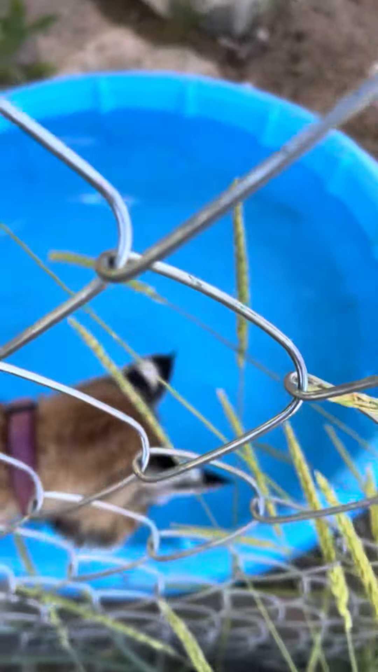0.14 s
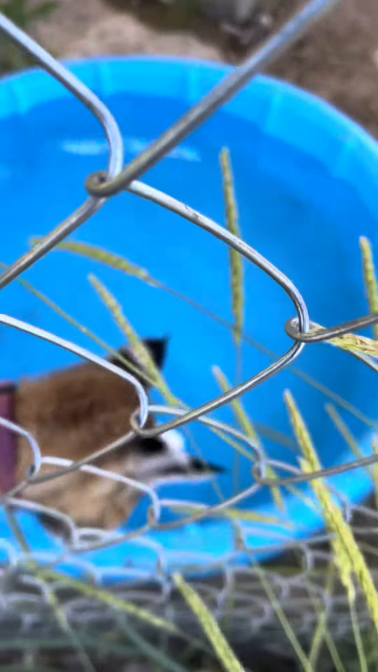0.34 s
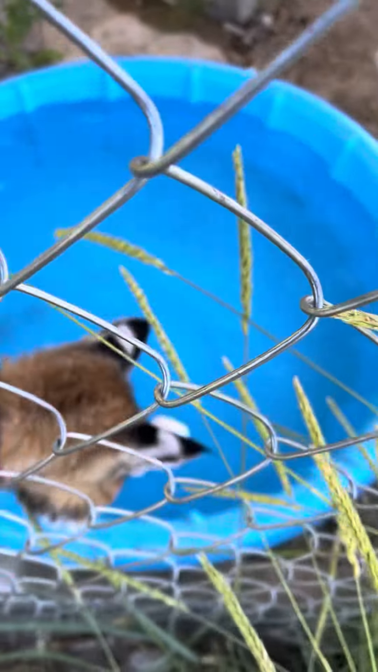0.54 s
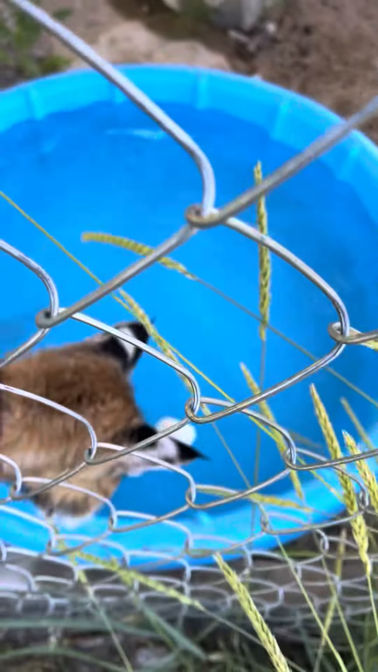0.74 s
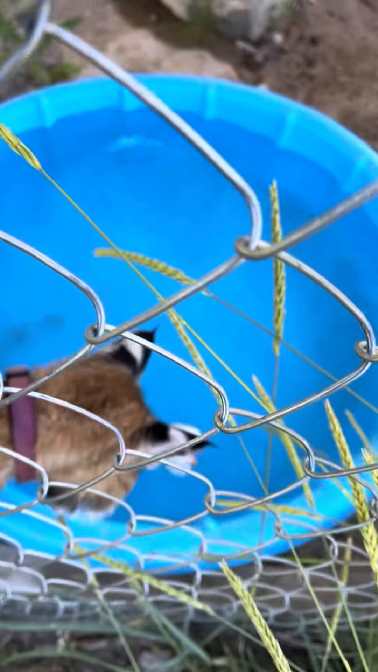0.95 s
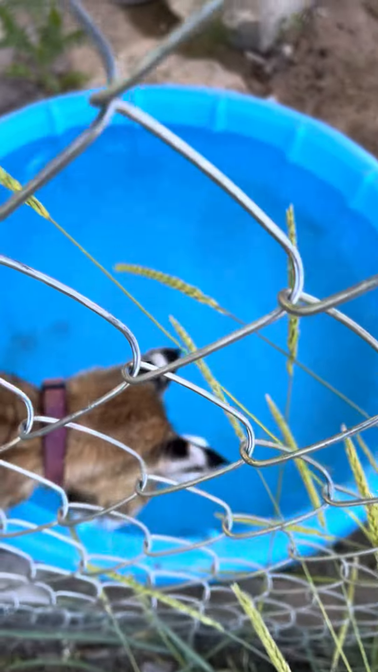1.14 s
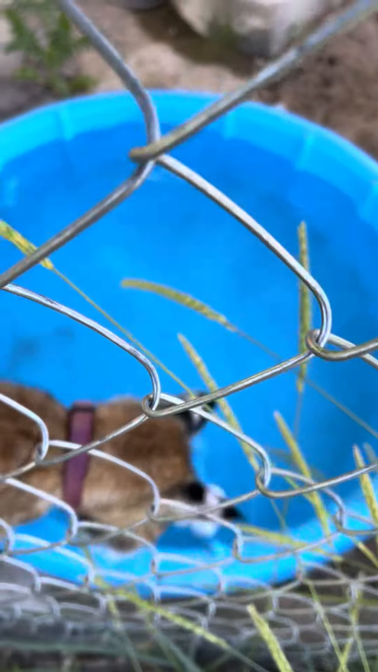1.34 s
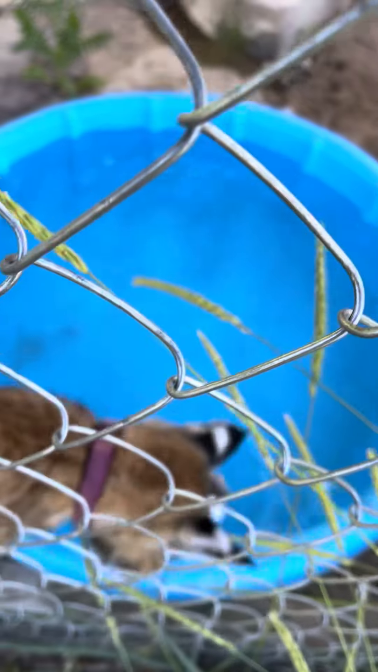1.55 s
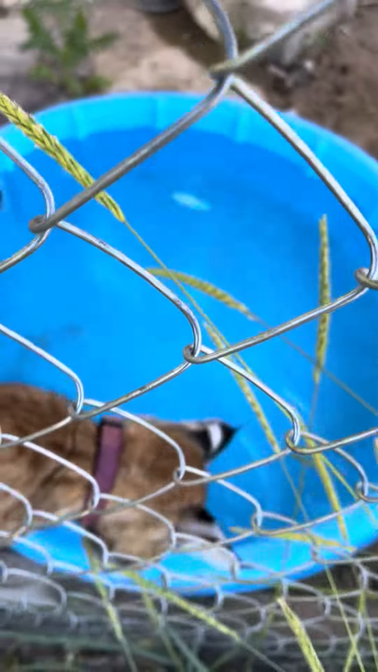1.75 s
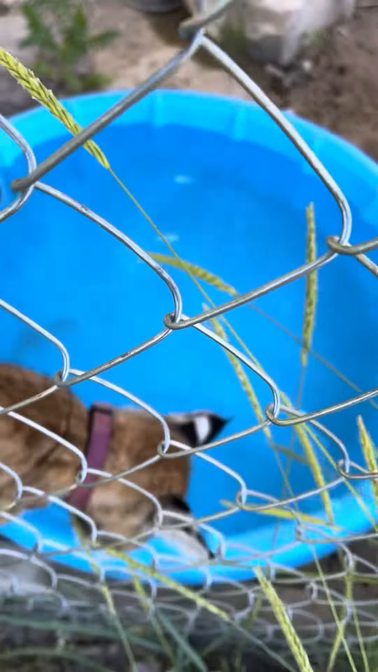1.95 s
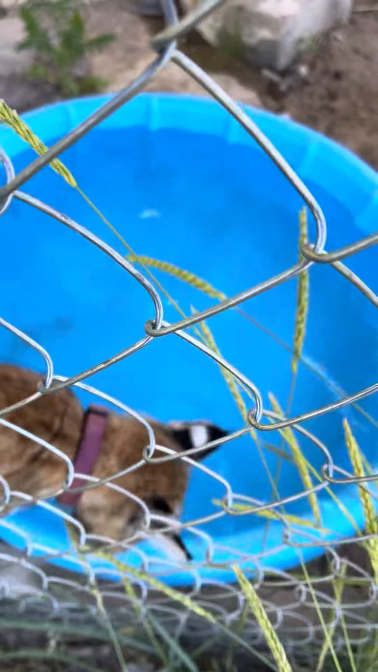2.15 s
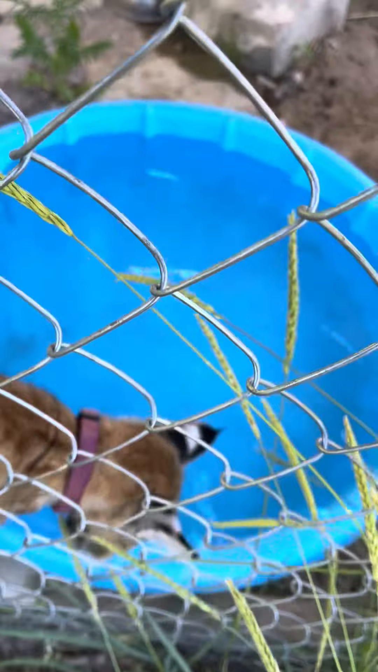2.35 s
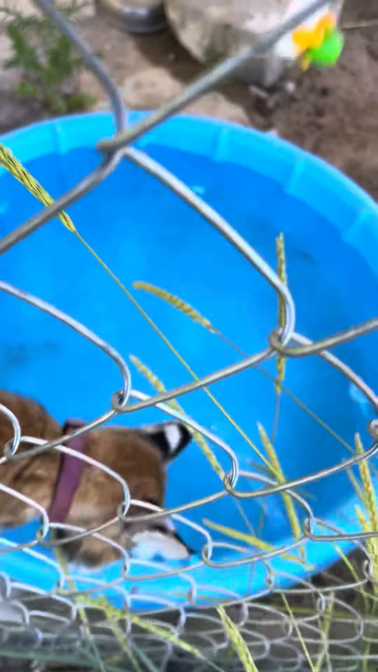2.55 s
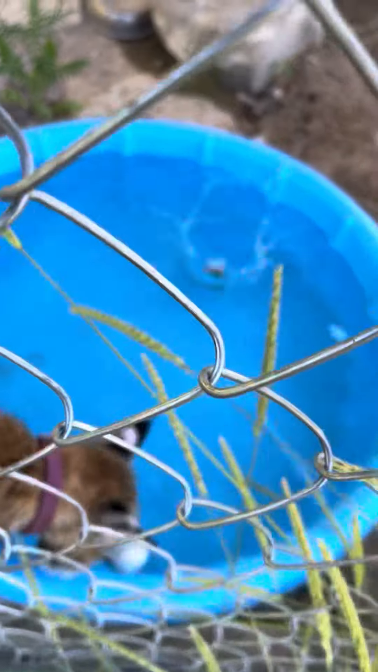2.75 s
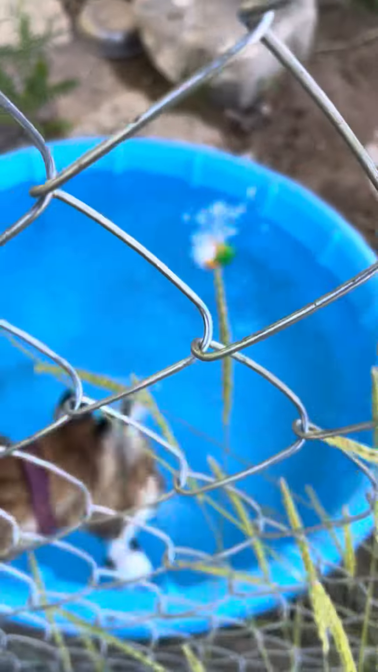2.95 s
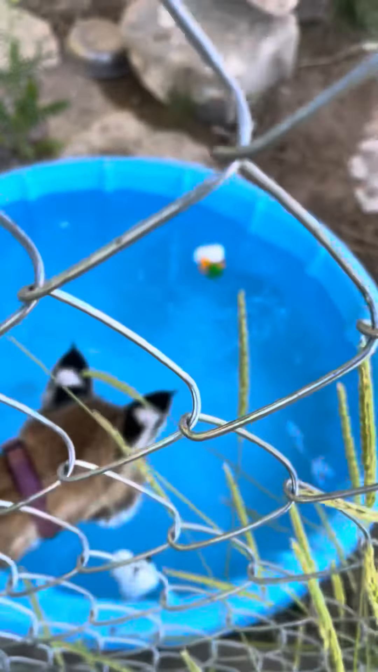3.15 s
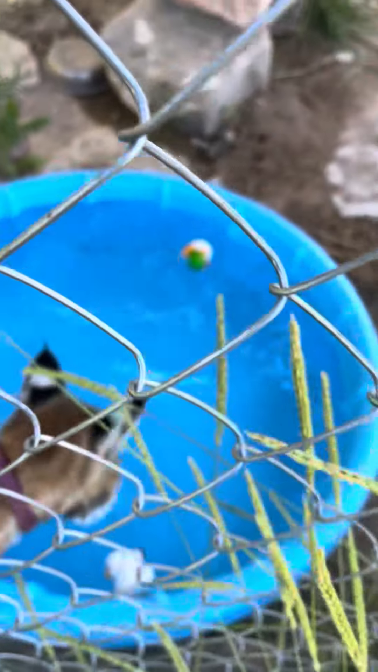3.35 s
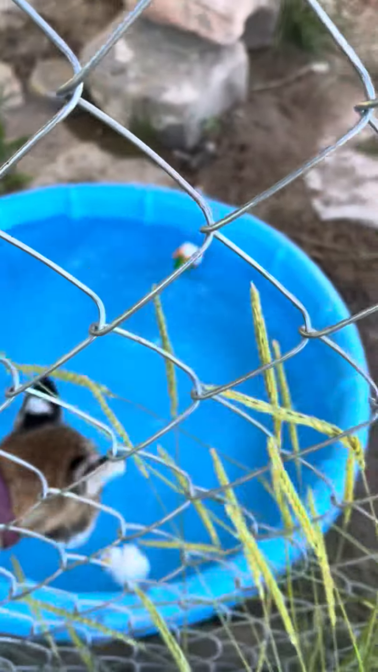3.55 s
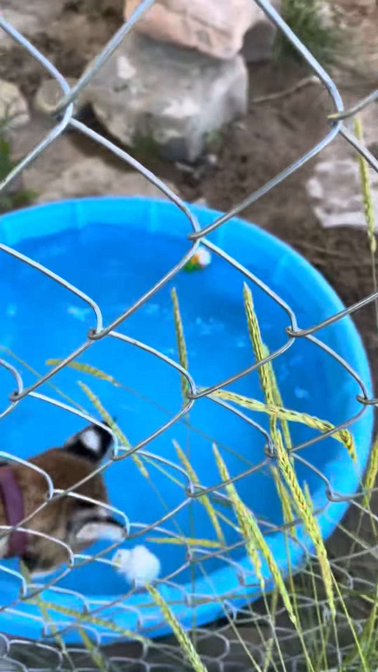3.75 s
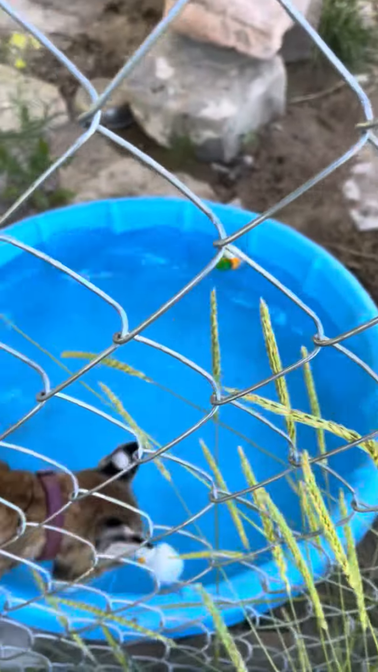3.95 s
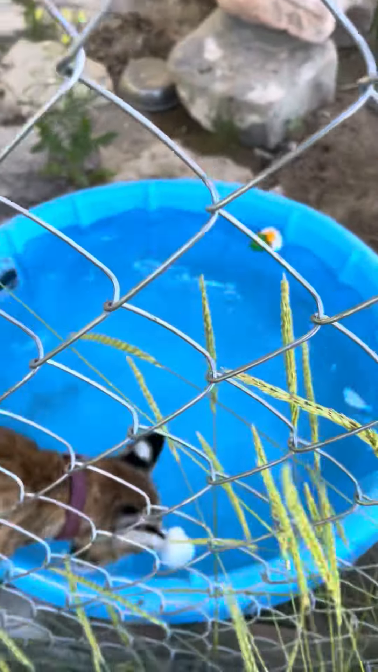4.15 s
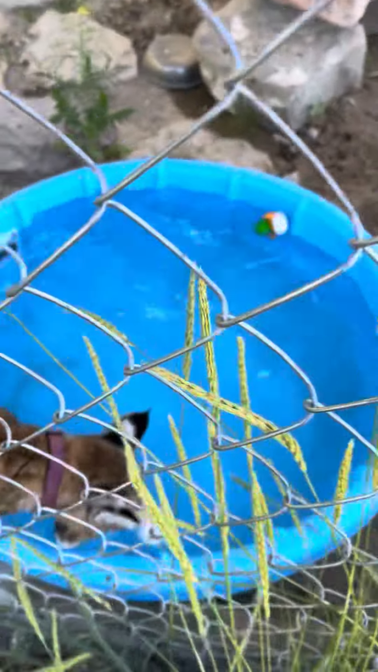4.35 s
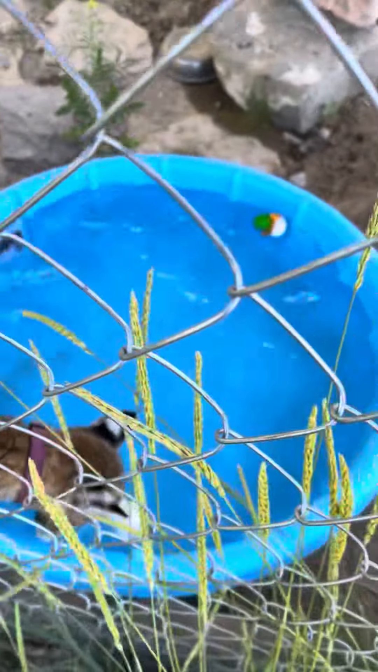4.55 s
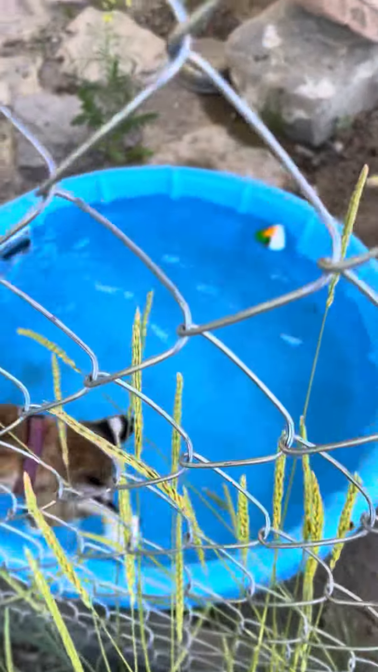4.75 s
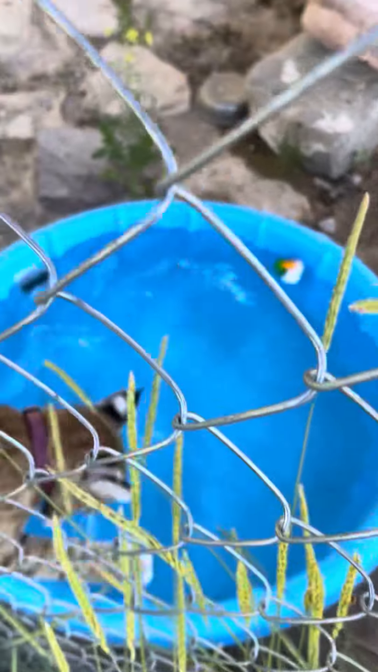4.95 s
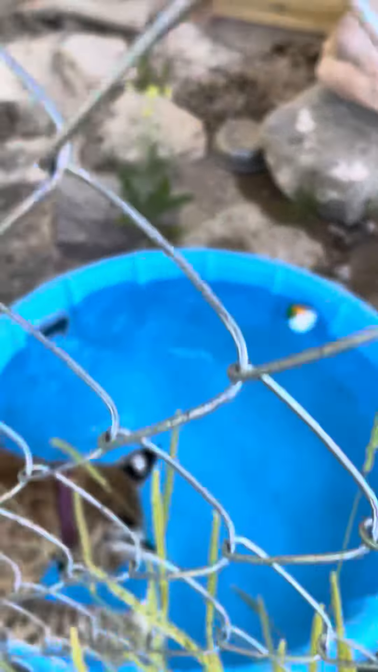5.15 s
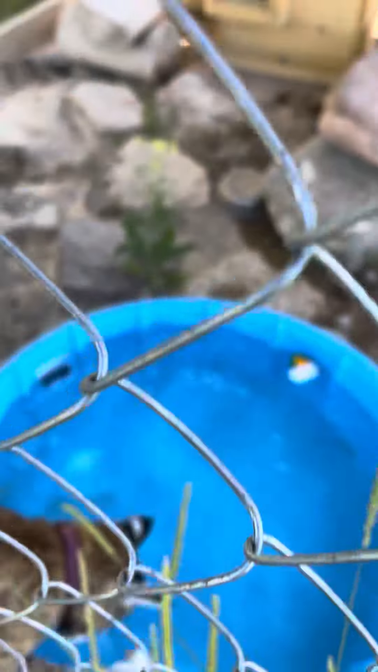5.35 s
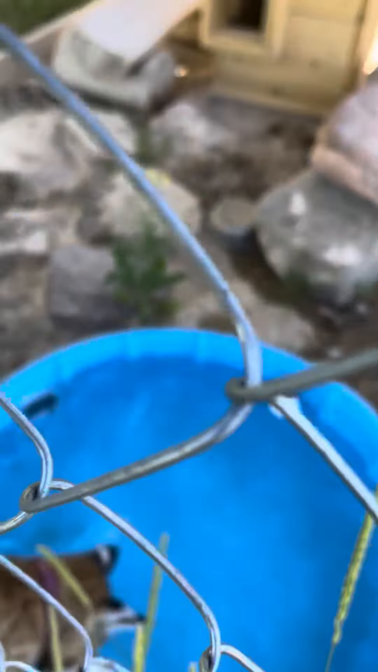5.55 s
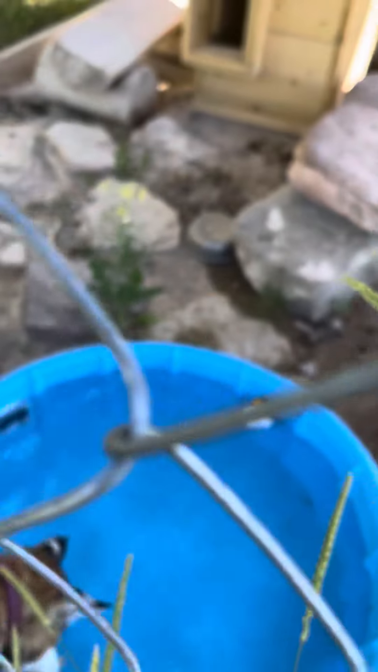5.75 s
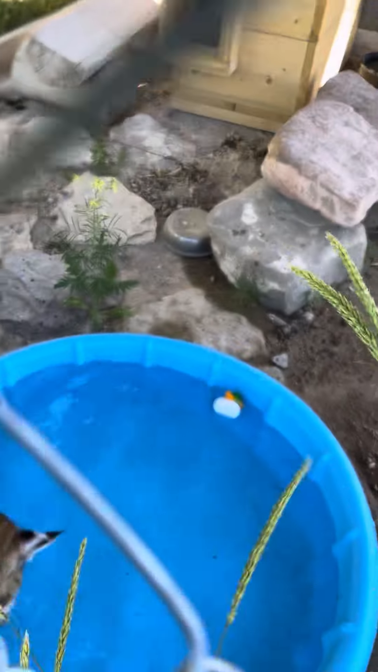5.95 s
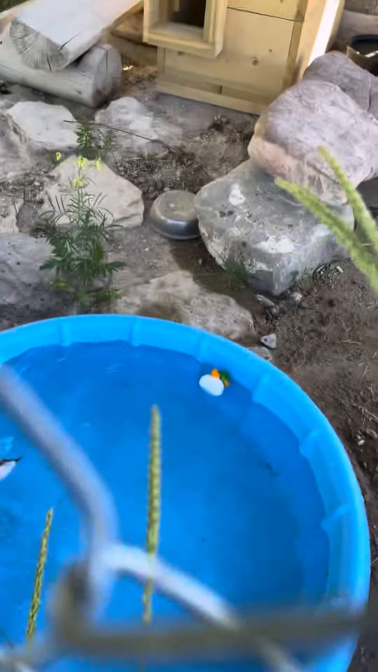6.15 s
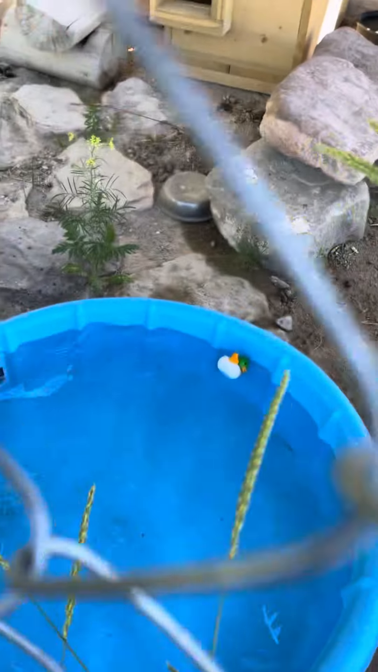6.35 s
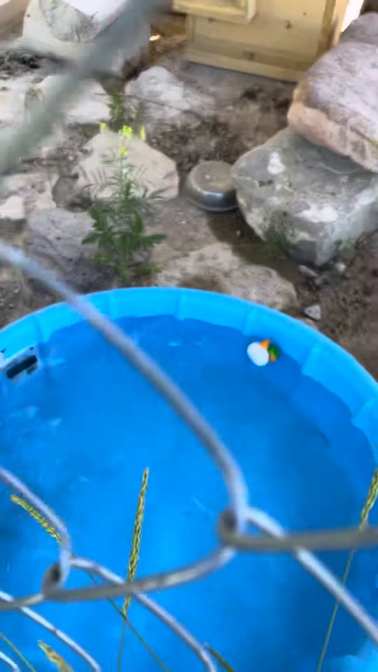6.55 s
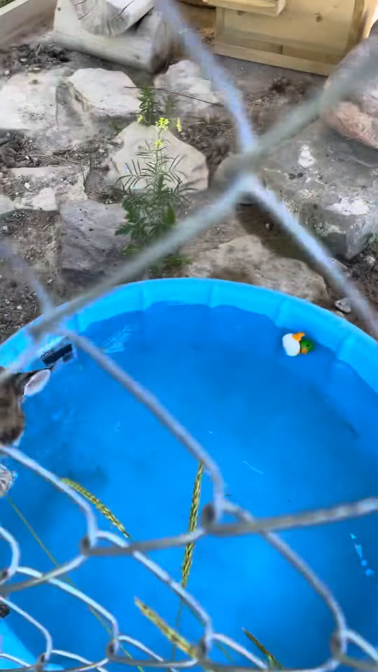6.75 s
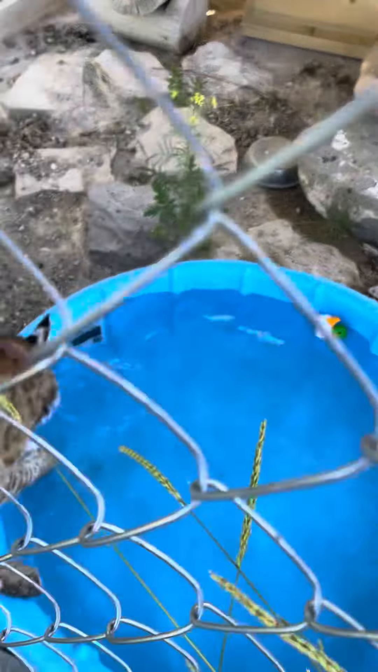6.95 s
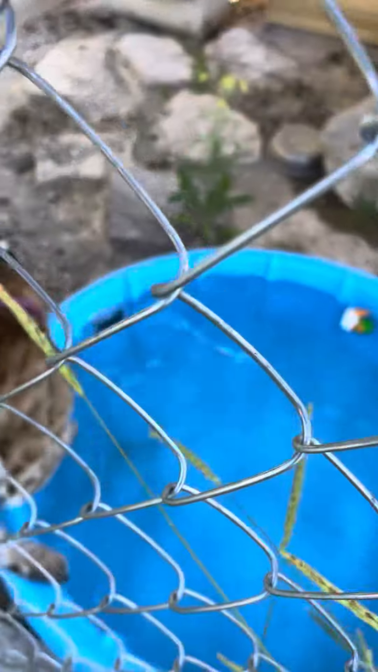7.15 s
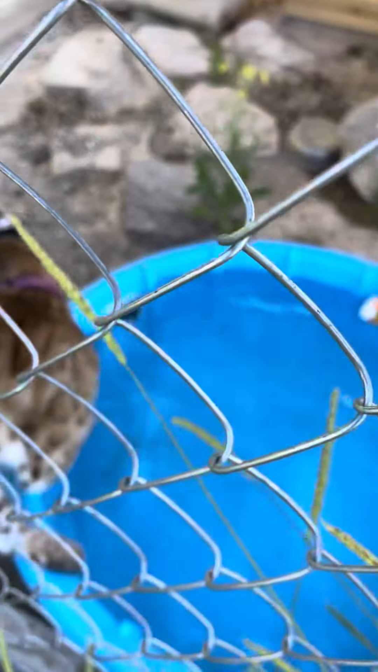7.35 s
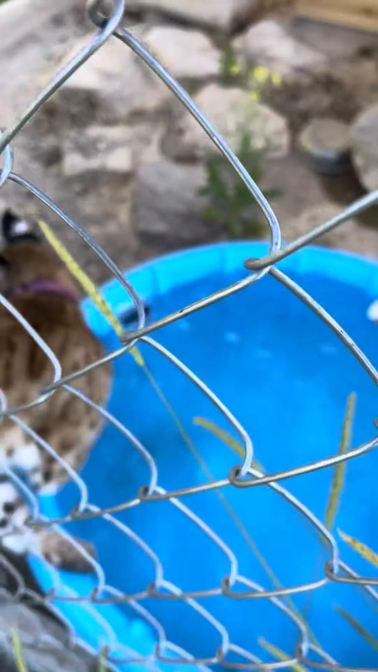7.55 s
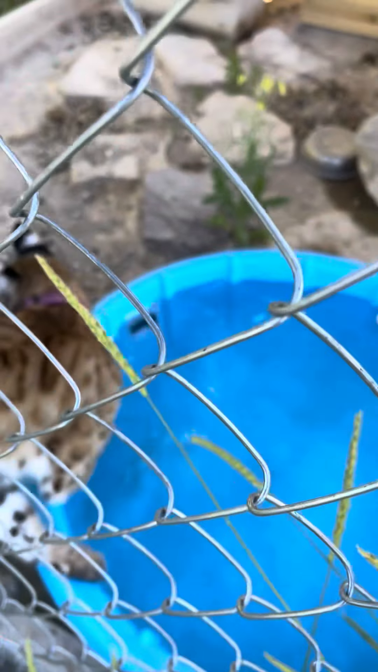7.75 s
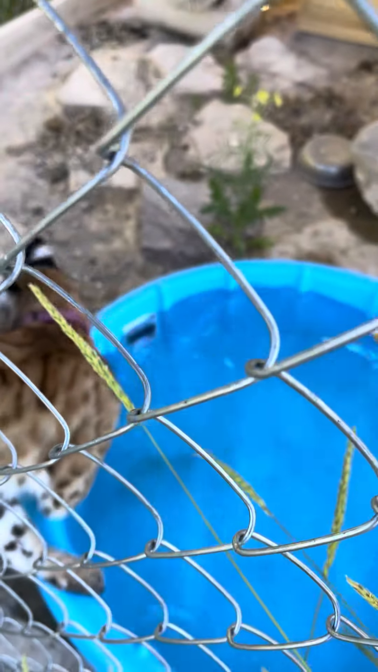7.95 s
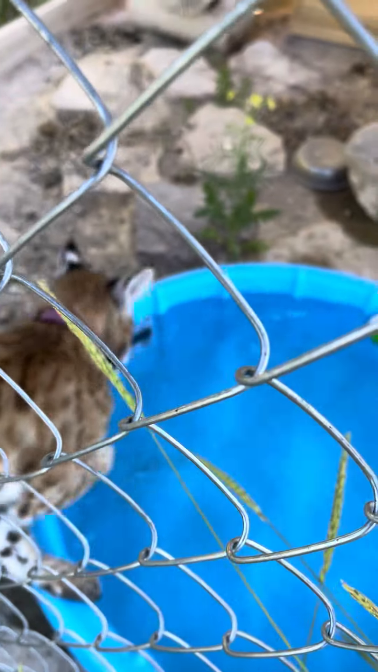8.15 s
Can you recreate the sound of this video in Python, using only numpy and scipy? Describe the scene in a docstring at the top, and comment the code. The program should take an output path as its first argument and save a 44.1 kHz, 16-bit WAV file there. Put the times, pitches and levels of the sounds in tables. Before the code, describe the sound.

A low fluttering throb in a quiet yard, then an animal splashes in a plastic pool, with one loud sharp slap and later hollow thumps.

```python
"""A low throb flutters over a quiet yard, then a wild cat wades in a plastic paddling pool outdoors.
Paws ring the modes of the thin tub; bubbles plop, air pockets gurgle and random drops spatter.
A tossed toy slaps the water hard, made as a noise crack with thin spray; grass rustles in noise swells.
A stereo spatializer turns the phase between left and right."""
import sys
import numpy as np
from scipy import signal
from scipy.fft import rfft, irfft, next_fast_len
from scipy.io import wavfile
from scipy.ndimage import uniform_filter1d

SR = 44100
rng = np.random.default_rng(int(sys.argv[2]) if len(sys.argv) > 2 else 0)


def materialize(psi):
    """Save the field psi as 16-bit PCM at rate SR to the path in sys.argv[1].

    A 1-D psi becomes a single channel; in a 2-D psi each row is a channel.
    """
    bounded = np.clip(np.atleast_2d(psi).T, -1, 1)
    quanta = np.round(bounded * 32767).astype(np.int16)
    wavfile.write(sys.argv[1], SR, quanta)


def rack_gain(trim_db):
    """Turn a fader trim in dB into the linear factor to multiply a signal by."""
    fader = np.asarray(trim_db, float)
    return 10 ** (fader / 20)


N = 365588


def rms_one(x):
    """Normalization: scales a signal to an effective value of one."""
    return x / np.sqrt(np.mean(x ** 2) + 1e-20)


def in_time(rows):
    """Linear interpolation: turns timed rows into one curve for each column."""
    s, *columns = np.transpose(rows)
    return [np.interp(np.arange(N) / SR, s, column) for column in columns]


def at_hz(points, hz):
    """Logarithmic frequency scale: interpolates a response evenly per octave."""
    point_hz, value = np.transpose(points)
    return np.interp(np.log(hz), np.log(point_hz), value)


def band(x, low_hz, high_hz):
    """Band-pass filtering: passes the range between two corner frequencies."""
    return signal.sosfilt(signal.butter(2, [low_hz, high_hz], "band", fs=SR, output="sos"), x)


def add(out, s, piece):
    """Superposition: adds a sound to the sum from time s onward."""
    at = round(s * SR)
    out[at:at + len(piece)] += piece[:N - at]


def drift(rate_hz):
    """Low-pass random process: slow chance of spread 1, from noise through a double pole at rate_hz."""
    every = 40   # samples between computed points
    r = np.exp(-2 * np.pi * rate_hz * every / SR)
    noise = rng.standard_normal(N // every + 2002)
    slow = signal.lfilter([1], [1, -2 * r, r * r], noise)[2000:]   # skips the filter's build-up
    return np.interp(np.arange(N) / every, np.arange(len(slow)), rms_one(slow))


def diffuse(spectrum, level_db, flicker_db, flicker_hz):
    """Diffuse-field coherence: coloured noise from all round, part shared and part opposed between sides."""
    # likeness of diffuse sound in the two channels: (frequency [Hz], correlation [-1 to 1])
    likeness = [(60, .97), (170, .8), (350, .2), (700, -.2), (1100, -.3), (1600, .85), (4400, .9),
                (4750, 1), (7300, .85), (8400, 1), (12000, .99)]
    hz = np.maximum(np.fft.rfftfreq(N, 1 / SR), 1)
    alike = at_hz(likeness, hz)
    mid, side = rfft(rng.standard_normal((2, N))) * rack_gain(at_hz(spectrum, hz))
    shared = np.sqrt(1 + alike) * mid
    opposed = np.sqrt(1 - alike) * side * [[1], [-1]]
    both = irfft(shared + opposed, N)
    return rms_one(both) * rack_gain(level_db + flicker_db * drift(flicker_hz))


def swells():
    """Addition of powers: each swell of rustle rises, holds on a slope and fades."""
    # rustling grass: (start [s], length [s], level at start [dB], slope while it lasts [dB/s])
    rustle_swells = [(1.495, 0.18, -65, 31), (2.73, 0.51, -60, 15), (3.63, 0.42, -54.5, 8.5),
                     (4.072, 0.31, -58.5, -7), (4.739, 0.22, -50, -10.5), (6.01, 0.59, -52.5, -1)]
    rise_s, fade_s = 0.078, 0.035   # time constants of amplitude
    t = np.arange(N) / SR
    power = 1e-12
    for start, length, db, slope in rustle_swells:
        rise = np.minimum(t - start, 0) / rise_s
        fade = np.maximum(t - start - length, 0) / fade_s
        held = rack_gain(db + slope * np.clip(t - start, 0, length))
        power = power + held ** 2 * np.exp(2 * (rise - fade))
    return np.sqrt(power)


def throb():
    """Frequency modulation: low beats whose pitch sinks exponentially, no two quite alike."""
    lone_beat_s, lone_beat_db = 0.016, -47
    run_start_s, beat_gap_s, beat_jitter_s = 0.187, 0.052, 0.002
    run_peak_s, run_peak_db, run_fall_db_per_s = 0.385, -43, 28   # loudest near the middle of the run
    out, t = np.zeros(N), np.arange(SR // 20) / SR
    wobble = drift(60)
    run = run_start_s + beat_gap_s * np.arange(11) + beat_jitter_s * rng.standard_normal(11)
    run_db = run_peak_db - run_fall_db_per_s * abs(run - run_peak_s)
    beats = [(lone_beat_s, lone_beat_db), *zip(run, run_db)]
    for (s, db), (pitch, length) in zip(beats, rng.normal(1, .1, (len(beats), 2))):
        sweep_hz = 310 * rack_gain(0.4 * (db - run_peak_db))   # weaker beats start lower
        hz = 92 * pitch + sweep_hz * np.exp(-t / 0.0033)
        phase = 2 * np.pi * np.cumsum(hz) / SR + 0.82 * wobble[round(s * SR):][:len(t)]
        shape = (1 - np.exp(-t / 0.0011)) / (1 + (t / (0.027 * length)) ** 6)
        add(out, s, rack_gain(db) * np.sin(phase) * shape)
    return out


def swashes():
    """Band-limited turbulence: lumpy noise some 500 Hz wide, swelling and sinking softly."""
    # soft rough surges of water: (time [s], length [s], centre [Hz], level before the lumps [dB])
    surges = [(4.136, 0.023, 544, -57), (4.178, 0.025, 715, -54), (4.497, 0.1, 489, -65),
              (5.755, 0.014, 2300, -53.5)]
    out, lumps = np.zeros(N), rack_gain(3.0 * drift(40))
    for s, length, hz, db in surges:
        t = np.arange(int((length + .05) * SR)) / SR
        edges = hz - 260, hz + 260
        noise = rms_one(band(band(rng.standard_normal(len(t)), *edges), *edges))
        shape = (1 - np.exp(-t / 0.002)) * np.exp(-np.maximum(t - length, 0) / 0.02)
        add(out, s, rack_gain(db) * shape * noise * lumps[round(s * SR):][:len(t)])
    return out


def bubble(hz, t60, rise):
    """Bubble resonance: a dying sine whose pitch climbs as the bubble nears the surface."""
    t = np.arange(int(t60 * SR) + 50) / SR
    tone = np.sin(2 * np.pi * hz * (t + rise * t * t / t60))
    return tone * rack_gain(-60 * t / t60) * (1 - np.exp(-t / 0.0004))


def spatter():
    """Poisson-like arrivals: small drops ring briefly at random, over a lumpy wash of thrown water."""
    # loose spatter: (start [s], end [s], drops [1/s], wash level [dB])
    showers = [(1.389, 2.15, 210, -74), (2.692, 2.75, 470, -46), (2.755, 3.308, 390, -63.5),
               (3.467, 3.504, 270, -42.5), (5.3, 6.018, 40, -74), (6.027, 6.75, 260, -60),
               (6.873, 6.98, 153, -53.5)]
    t = np.arange(N) / SR
    per_s, wash = np.zeros(N), np.zeros(N)
    for start, end, rate, db in showers:
        falling = (t > start) * (t < end)
        per_s += rate * falling
        wash += rack_gain(db) * falling
    wash = uniform_filter1d(wash, size=800)   # softens the starts and ends

    sizes = rack_gain(4.5 * np.minimum(rng.exponential(1, N), 3)) * rng.choice([-1, 1], N)
    born = rng.random(N) < per_s / SR
    dealt = rng.integers(0, 16, N)   # gives each drop one of 16 pitches
    drops = 0
    for k, hz in enumerate(np.geomspace(1000, 6500, 16)):
        drop = bubble(hz, 22.0 / hz + .005, rise=.25)
        drops = drops + signal.oaconvolve(sizes * born * (dealt == k), drop)[:N]

    edges = np.geomspace(600, 4200, 4)
    lumps = 0
    for low, high in zip(edges, edges[1:]):   # each band swells by itself
        noise = rms_one(band(rng.standard_normal(N), low, high))
        lumps = lumps + noise * rack_gain(9.5 * drift(20))
    return rack_gain(-56) * drops + wash * rms_one(lumps)


def gurgles():
    """Cavity resonance: a trapped air pocket glides and wavers; jolting water breaks up the longer ones."""
    # air pockets: (time [s], length [s], first pitch [Hz], last pitch [Hz], level [dB])
    pockets = [(1.861, 0.046, 954, 760, -50), (3.124, 0.024, 696, 900, -51.5),
               (3.168, 0.0042, 1020, 1350, -39), (3.202, 0.011, 1640, 1720, -51.5),
               (3.241, 0.0076, 1740, 1590, -39.5), (4.508, 0.024, 856, 830, -60),
               (5.833, 0.036, 760, 1023, -61.5), (5.975, 0.017, 1300, 1150, -62),
               (6.023, 0.005, 930, 880, -41.5), (6.156, 0.053, 756, 791, -34),
               (6.213, 0.04, 832, 653, -35.5), (6.262, 0.014, 700, 750, -44), (6.358, 0.054, 597, 550, -48)]
    out, jolts, waver = np.zeros(N), drift(149) + 1j * drift(145), drift(30)
    for s, length, first_hz, last_hz, db in pockets:
        t, at = np.arange(int((length + 0.0532) * SR)) / SR, round(s * SR)
        rough = min(length / .12, .9)
        glide_hz = np.interp(t, [0, length + 0.0039], [first_hz, last_hz])
        hz = glide_hz * (1 + .07 * rough * waver[at:at + len(t)])
        shape = (1 - np.exp(-t / 0.0012)) * np.exp(-np.maximum(t - length, 0) / 0.007)
        drive = 1 - rough + rough * jolts[at:at + len(t)]   # jolts both strength and phase
        tone = np.imag(drive * np.exp(2j * np.pi * np.cumsum(hz) / SR))
        add(out, s, rack_gain(db) * shape * tone)
    return out


def ticks():
    """Impulsive noise: a light touch, 2 ms later the crack of a drop or slap, then thin spray."""
    # drops and slaps on water and plastic:
    # (time [s], crack peak [dB], centre [Hz], top treble relative to the crack [dB])
    impacts = [(0.3215, -39, 7300, -12), (0.464, -39, 6460, -36), (1.464, -38, 3000, -16),
               (1.74, -32, 3800, -30), (1.8797, -29, 5870, -3), (2.7022, -2, 3900, -15),
               (2.7584, -37.5, 7000, 10.5), (2.798, -18.5, 6650, -6.5), (2.874, -31, 4500, -5),
               (2.918, -18.5, 6200, -7), (3.0024, -25.5, 6340, -14), (3.062, -23, 6600, -13.5),
               (3.099, -34.5, 3660, -9), (3.179, -32, 4650, -6.5), (3.273, -24.5, 5930, -4),
               (5.3742, -40.5, 4160, -41), (5.499, -40, 3820, -1.5), (5.725, -20, 4970, -22),
               (5.942, -33.5, 4430, -52), (6.0689, -25.5, 8200, -17), (6.557, -35, 3230, 11.5),
               (6.971, -38, 5600, -18.5)]
    out, t = np.zeros(N), np.arange(SR // 5) / SR
    after = np.maximum(t - .0025, 0)
    burst = np.exp(-after / .0005) + .15 * np.exp(-after / .005) + .04 * np.exp(-after / .025)
    shape = np.where(t < .0025, .12, burst)
    for s, db, hz, top_db in impacts:
        low, wide, top = rng.standard_normal((3, len(t))) * shape
        crack = rms_one(band(low, hz * 0.78, hz * 1.39)) + 0.39 * rms_one(band(wide, 2000, 8900))
        top = band(band(top, 9500, 12200), 9500, 12200)
        tick = crack / np.abs(crack).max() + rack_gain(top_db) * top / np.abs(top).max()
        add(out, s - .002, rack_gain(db) * tick)
    return out


def plops():
    """Bubble resonance: a tone along with a short wet smack; small bubbles die sooner."""
    # single bubbles closing: (time [s], nominal level [dB], pitch [Hz])
    closings = [(1.396, -43, 1050), (1.497, -33.5, 1030), (1.518, -42, 2020), (1.558, -37.5, 1350),
                (1.601, -37.5, 1080), (1.737, -41, 910), (1.787, -43.5, 1090), (1.81, -46.5, 3150),
                (1.836, -36, 800), (1.843, -43.5, 2190), (1.88, -33.5, 934), (1.982, -53, 1510),
                (2.037, -44, 1050), (2.06, -44, 1050), (2.106, -43, 1010), (2.702, -29, 1340),
                (2.798, -36, 2150), (2.81, -34, 2830), (2.83, -40, 3150), (2.924, -41, 2590),
                (2.944, -43.5, 1710), (3.07, -42, 1460), (3.15, -40.5, 2100), (3.271, -34, 1620),
                (4.115, -38, 820), (5.311, -43, 2690), (5.471, -52, 3230), (5.725, -31.5, 2300),
                (5.887, -54, 1460), (6.0048, -47, 3110), (6.071, -45, 1660), (6.14, -41, 1170),
                (6.154, -30, 805), (6.217, -43.5, 2130), (6.251, -41, 1890), (6.305, -36.5, 1650),
                (6.337, -40.5, 990), (6.36, -37.5, 2260), (6.384, -38.5, 1830), (6.455, -21.5, 840),
                (6.481, -31, 1310), (6.534, -26.5, 1016), (6.562, -38.5, 1920), (6.606, -40, 3000),
                (6.687, -49, 1900), (6.726, -35, 826), (6.859, -45, 1280), (6.874, -46.5, 1420),
                (6.918, -37.5, 744), (6.954, -45, 2200)]
    out, t = np.zeros(N), np.arange(SR // 10) / SR
    for s, db, hz in closings:
        t60 = (0.012 + 18.0 / hz) * rng.uniform(.7, 1.4)
        smack = rng.standard_normal(len(t)) * (np.exp(-t / 0.00075) + 0.24 * rack_gain(-30 * t / t60))
        wet = band(band(smack, hz * 0.62, hz * 2.4), hz * 0.62, hz * 2.4)
        add(out, s, rack_gain(db + 1.0) * bubble(hz, t60, rise=0.13))
        add(out, s, rack_gain(db - 2.5) * wet / np.abs(wet).max())
    return out


def thumps():
    """Modal excitation: a few ms of uneven contact ring all tub modes, with a slap of water."""
    # paw against the tub: (time [s], peak of the ring [dB], favoured pitch [Hz], basic ring t60 [s])
    blows = [(1.396, -33.5, 237, 0.22), (1.47, -40, 252, 0.22), (1.606, -33.5, 245, 0.21),
             (1.687, -36.5, 400, 0.15), (1.786, -44, 259, 0.096), (1.88, -39.5, 410, 0.16),
             (1.933, -32.5, 372, 0.16), (2.04, -38, 345, 0.56), (2.105, -33.5, 390, 0.075),
             (2.7, -26.5, 293, 0.023), (3.475, -39.5, 298, 0.29), (6.154, -25.5, 324, 0.017),
             (6.457, -16.5, 230, 0.22), (6.529, -35.5, 217, 0.37), (6.638, -44, 314, 0.58),
             (6.74, -36.5, 293, 0.11), (6.92, -30, 292, 0.38), (7.016, -34.5, 311, 0.25),
             (8.124, -45.5, 301, 0.37)]
    # modes of the tub: (frequency before detuning [Hz], level [dB], share of the ring time [ratio])
    tub_modes = [(168.1, -2.5, 1.1), (237, 3, 0.41), (297.3, 3.5, 0.81), (340.6, 0.5, 0.73),
                 (418.8, 1, 0.93)]
    out, t, shaken = np.zeros(N), np.arange(SR // 2) / SR, drift(50)
    for s, db, favoured_hz, ring in blows:
        contact = rng.standard_normal(len(t)) * (np.exp(-t / 0.005) + 0.22 * np.exp(-t / 0.035))
        blow = 0
        chances = rng.standard_normal((len(tub_modes), 2))
        for (hz, mode_db, share), (strength, detune) in zip(tub_modes, chances):
            r = rack_gain(-60 / (max(ring * share, .01) * SR))   # decay per sample
            w = 2 * np.pi * hz * (1 + 0.028 * detune) / SR
            mode = signal.lfilter([0, np.sin(w)], [1, -2 * r * np.cos(w), r * r], contact)
            place_db = -16 * abs(np.log2(hz / favoured_hz))   # the struck spot favours modes near one pitch
            blow = blow + rack_gain(mode_db + place_db + 2.0 * strength) * mode
        # water shakes the wall and soon stills it
        lapping = rack_gain(2.2 * shaken[round(s * SR):][:len(t)])
        stilling = np.exp(-(t / (0.5 * ring + .03)) ** 3)[:len(lapping)]
        blow = blow[:len(lapping)] * lapping * stilling
        blow = band(blow, 115, 720)   # the thin wall radiates no deep bass
        slap = band(band(contact, 350, 1500), 300, 2400)[:len(blow)]
        thump = blow / np.abs(blow).max() + rack_gain(-7.0) * slap / np.abs(slap).max()
        add(out, s + 0.0011, rack_gain(db) * thump)
    return out


def yard(x):
    """Early reflection: dull echoes from rocks and the tub wall, a different one on each side."""
    dull, out = band(x, 160, 6100), np.zeros((2, N))
    for side, (lag_s, db) in enumerate([(.004, -18), (.0055, -17)]):
        add(out[side], lag_s, rack_gain(db) * dull)
    return out


def scene():
    """Superposition: diffuse air noises, the centred pool and its echoes add up."""
    # noise spectra before level scaling: (frequency [Hz], relative spectral level [dB])
    rumble = [(25, -20.5), (40, 0), (60, 9.5), (100, 2.5), (200, -39)]
    slosh = [(80, -6), (170, -3), (500, -6.5), (900, -12), (1400, -20.5), (2500, -31)]
    hiss = [(700, -26.5), (1500, -7), (2600, -6), (5000, -2.5), (7300, -3), (9000, 1), (11000, -9.5),
            (13000, -33.5)]
    rustle = [(400, -9), (1500, -5), (3400, -10), (7300, -4.5), (11400, 0), (12500, -14.5), (14000, -26.5),
              (16000, -50)]
    # rumble level before flicker: (time [s], level [dB])
    rumble_level = [(0, -64.5), (8.29, -67)]
    # background levels before flicker: (time [s], slosh [dB], yard hiss [dB])
    background = [(0, -62, -65), (0.5, -67.5, -64), (0.75, -56, -62.5), (1.0, -65, -64), (1.35, -66, -63.5),
                  (1.6, -58.5, -63), (2.2, -59.5, -65.5), (2.7, -55, -58), (3.28, -59, -60),
                  (3.4, -59.5, -60), (4.05, -65.5, -57), (4.9, -60, -73), (5.05, -62.5, -64.5),
                  (5.6, -64.5, -63.5), (5.95, -71, -65.5), (6.3, -54.5, -91), (6.7, -55.5, -63),
                  (7.15, -71.5, -67.5), (8.29, -67.5, -70)]
    slosh_db, hiss_db = in_time(background)
    air = diffuse(rumble, *in_time(rumble_level), flicker_db=1.5, flicker_hz=4)
    air = air + diffuse(slosh, slosh_db, flicker_db=2.7, flicker_hz=1.9)
    air = air + diffuse(hiss, hiss_db, flicker_db=2.3, flicker_hz=5)
    air = air + swells() * diffuse(rustle, 0, flicker_db=2.0, flicker_hz=12)
    pool = throb() + swashes() + spatter() + gurgles() + ticks() + plops() + thumps()
    return pool + yard(pool) + air


def top_cut(x):
    """Nothing passes above the cut-off."""
    return signal.sosfilt(signal.butter(12, 16350, fs=SR, output="sos"), x)


def record(dry):
    """Stereo widening: a fixed phase and level curve turns the sides apart; the top rolls off steeply."""
    # phase between the channels: (frequency [Hz], lead of left over right [rad])
    lead = [(1550, 0), (2900, 1.1), (3950, .9), (4480, 1.9), (4750, 3.13), (5000, 3.15), (5340, 5.1),
            (5700, 6.1), (6050, 6.3), (7240, 7.7), (8400, 9.42), (9600, 9.43), (11400, 11.6), (13000, 12.3)]
    # level between the channels: (frequency [Hz], left minus right [dB])
    tilt = [(30, 0), (100, -1.5), (250, -3.5), (600, -3.5), (1000, -1), (1500, -.3)]
    size = next_fast_len(N + 4096)
    hz = np.maximum(np.fft.rfftfreq(size, 1 / SR), 1)
    # each channel takes half of the difference, in opposite senses
    half = rack_gain(at_hz(tilt, hz) / 2) * np.exp(.5j * np.interp(hz, *np.transpose(lead)))
    roll_off = 1 + (hz / 13300) ** 16
    widened = irfft(rfft(dry, size) * [half, 1 / half] / roll_off, size)[:, :N]
    return top_cut(widened)


dry = scene()
out = record(dry)
materialize(out)
```